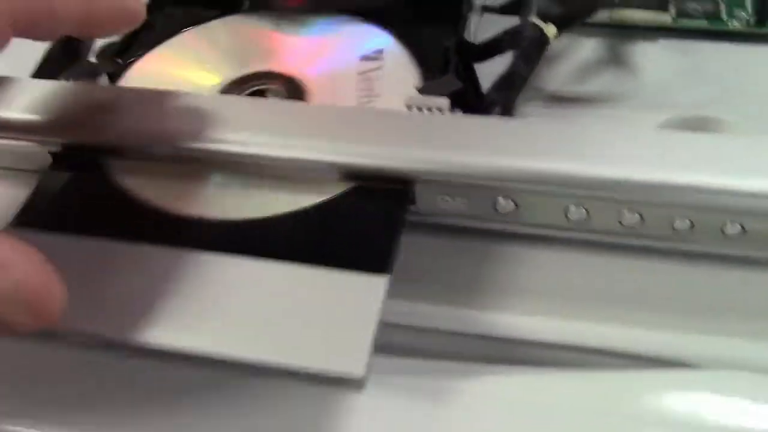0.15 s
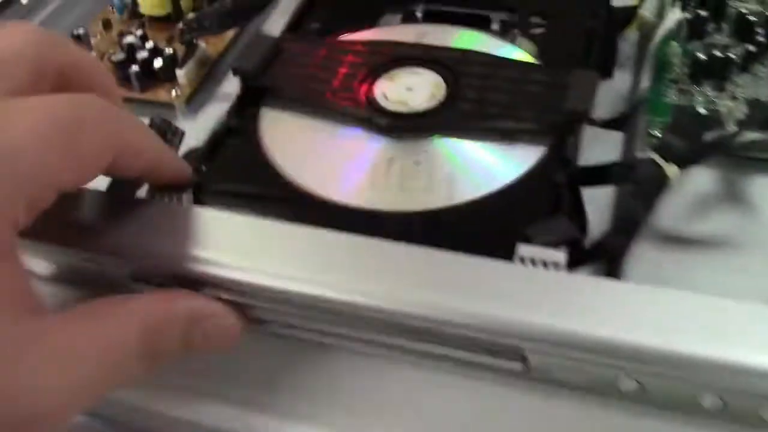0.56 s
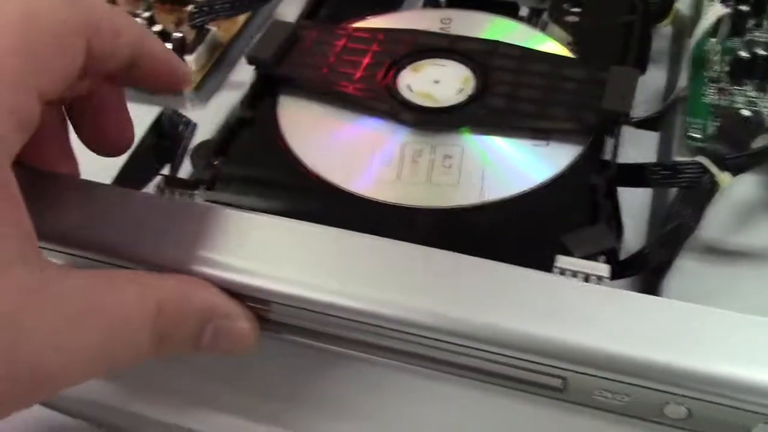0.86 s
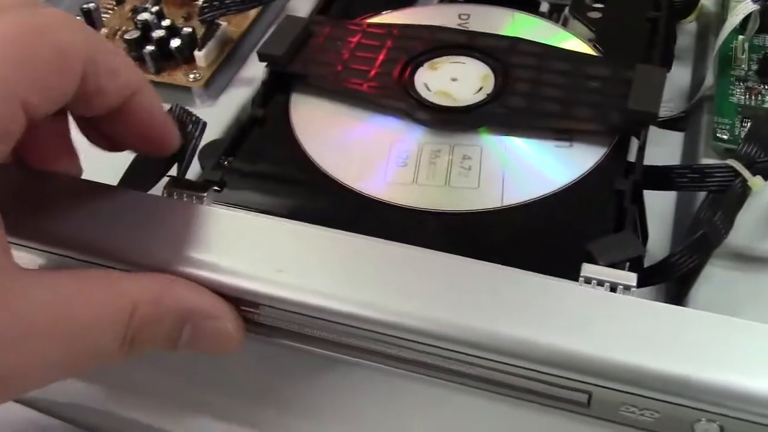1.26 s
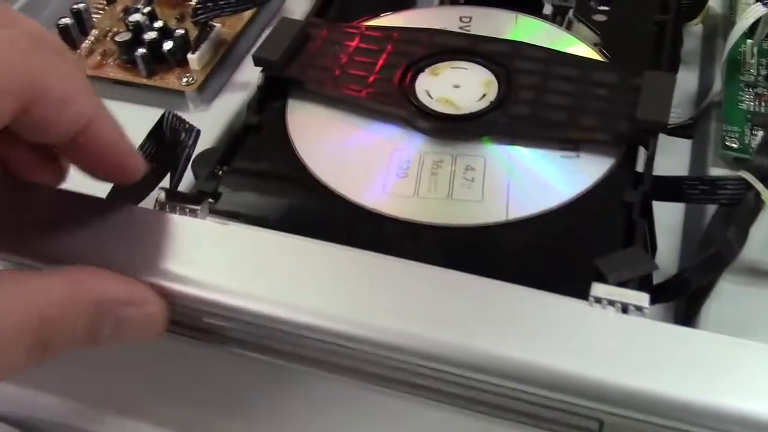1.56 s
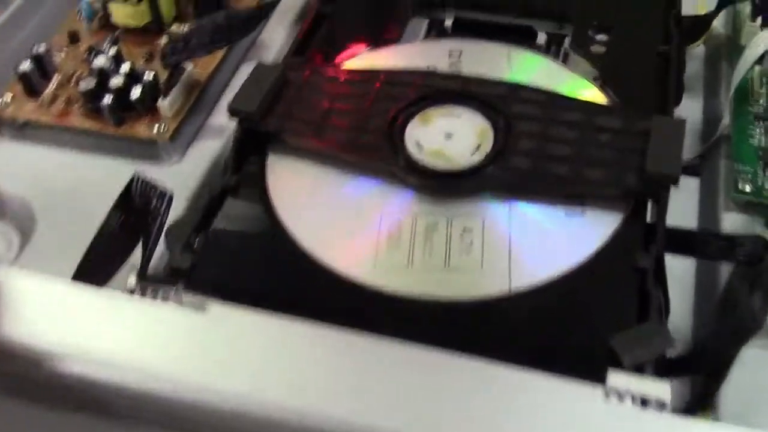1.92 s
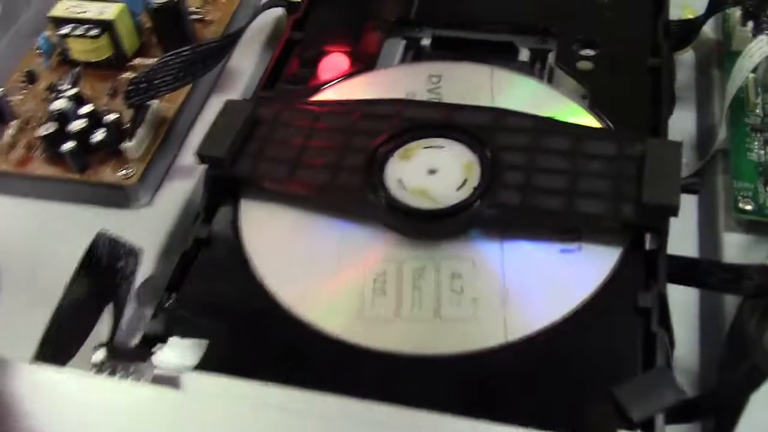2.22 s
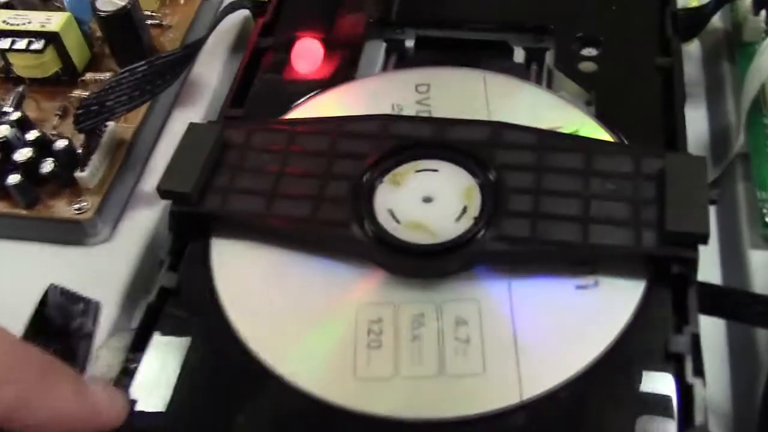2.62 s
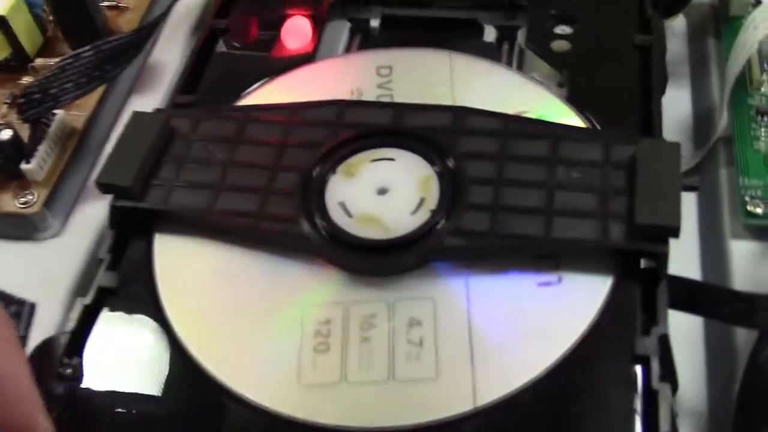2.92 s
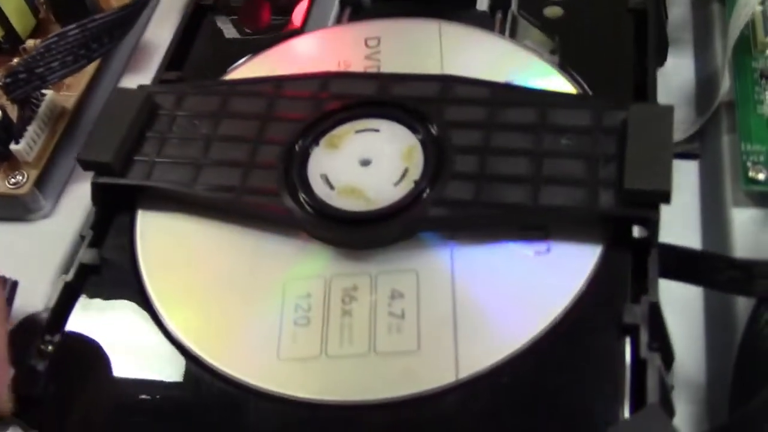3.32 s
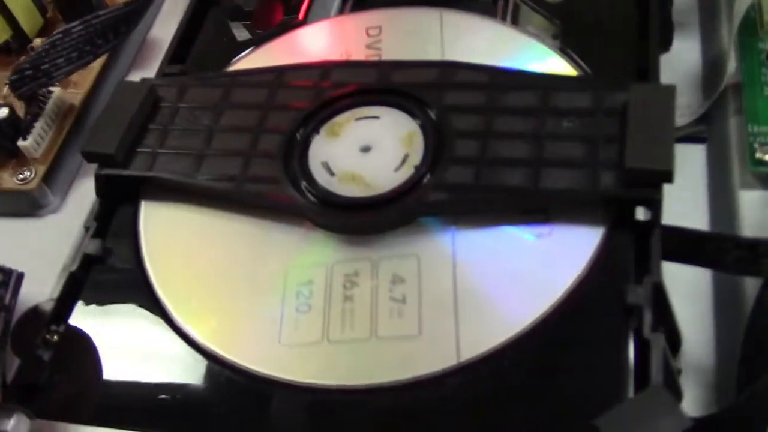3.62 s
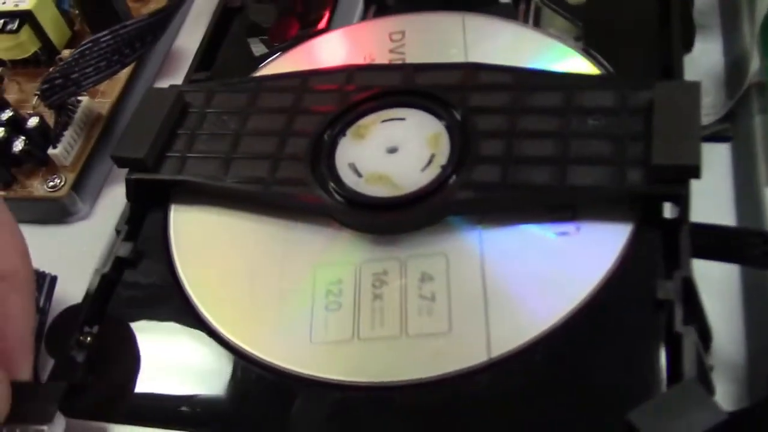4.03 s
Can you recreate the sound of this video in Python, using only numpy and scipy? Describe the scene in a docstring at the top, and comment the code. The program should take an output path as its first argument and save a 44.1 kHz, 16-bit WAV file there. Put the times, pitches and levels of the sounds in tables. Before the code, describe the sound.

A plastic disc tray is pushed in with a gritty whirring scrape, clatters shut sharply, then faint ticks and rustles over low hum.

```python
"""The disc tray of an opened DVD player is pushed shut by hand on a workbench, close to a stereo pair.
Gears whine at their tooth rate and rails rub as gritty noise; shaped noise bursts, ringing in the plastic,
make the latch, the stop and the clatter of the clamp.
Then filtered noise and short contacts tick and rustle faintly, over sine hum and a noise floor."""
import sys
import numpy as np
from scipy import signal
from scipy.fft import rfft, irfft, next_fast_len
from scipy.io import wavfile

SR = 44100
rng = np.random.default_rng(int(sys.argv[2]) if len(sys.argv) > 2 else 0)


def pcm_store(signal):
    """Save signal as 16-bit PCM."""
    levels = np.round(np.clip(np.atleast_2d(signal), -1, 1) * 32767)
    wavfile.write(sys.argv[1], SR, levels.astype(np.int16).T)


N = 184073
TIME = np.arange(N) / SR   # s

# How alike near sounds reach left and right. Each row: frequency in Hz, correlation.
NEAR_LIKENESS = [(150, 0.97), (700, 0.94), (2400, 0.94), (4400, 0.84), (15000, 0.64)]

STOP_S, SEATING_S = 0.562, 0.025   # the tray reaches its stop and takes this long to seat
TOUCH_S = 0.0011   # rise of the scrape before a square contact


def from_db(db):
    """Decibels to gain."""
    return 10 ** (np.asarray(db) / 20)


def rms_one(x):
    """Scale to rms 1."""
    return x / np.sqrt(np.mean(x ** 2) + 1e-20)


def at_hz(points, hz):
    """Read a curve over frequency on a log-frequency axis."""
    point_hz, values = np.transpose(points)
    return np.interp(np.log(hz + 0.001), np.log(point_hz), values)


def cut(x, hz, kind, order=2):
    """Butterworth filter."""
    sections = signal.butter(order, np.clip(hz, 10, 0.45 * SR), kind, fs=SR, output="sos")
    return signal.sosfilt(sections, x + 1e-18)


def drift(rate):
    """Random wander through normal knots of spread 1, at this many knots per second."""
    knots = rng.standard_normal(4096)
    return np.interp(TIME * rate, np.arange(len(knots)), knots)


def stereo_pair(mid, side, likeness):
    """Mix two independent signals into left and right with the given correlation."""
    alike = np.clip(likeness, -1, 1)
    return np.sqrt(1 + alike) * mid + np.sqrt(1 - alike) * side * [[1], [-1]]


def noise(spectrum, likeness, grain_db=0):
    """Coloured stereo noise of rms 1; uneven sample sizes make it gritty."""
    size = next_fast_len(N)
    hz = np.arange(size // 2 + 1) * SR / size
    grain = from_db(grain_db * np.minimum(rng.exponential(1, N), 6))
    mid, side = rfft(rng.standard_normal((2, N)) * grain, size)
    pair = stereo_pair(mid, side, at_hz(likeness, hz))
    coloured = pair * from_db(at_hz(spectrum, hz))
    return rms_one(irfft(coloured, size)[:, :N])


def resonate(x, resonances):
    """Sum of parallel two-pole resonances; each row: frequency in Hz, width in Hz, level in dB."""
    out = 0
    for hz, width, db in resonances:
        radius = np.exp(-np.pi * max(width, 10) / SR)
        zeros = np.array([1, 0, -1]) * (1 - radius ** 2) / 2
        poles = [1, -2 * radius * np.cos(2 * np.pi * hz / SR), radius ** 2]
        out = out + from_db(db) * signal.lfilter(zeros, poles, x)
    return out


def frame(x, share):
    """The plastic tray and frame add a share of their resonances to whatever passes through."""
    # Each row: frequency in Hz, width in Hz, relative level in dB.
    frame_modes = [(495, 26, 0), (880, 26, -4), (1352, 40.2, -7.5), (1523, 32, -1.5), (1789, 73, -4.5),
                   (2383, 52, 3.5), (2786, 44.4, -4.5), (3317, 50, 4), (3730, 142, 2.5), (6600, 42.3, -3),
                   (7090, 220, -6)]
    return x + share * resonate(x, frame_modes)


def case(x, echo_db=-7, fade_s=0.0069, count=40):
    """Quick reflections between the walls of the open case comb the treble."""
    delays = rng.uniform(0.001, 0.03, count)   # s
    sizes = np.exp(-delays / fade_s) * rng.choice([-1, 1], count)
    echoes = np.zeros(SR // 20)
    echoes[(delays * SR).astype(int)] = from_db(echo_db) * sizes / np.linalg.norm(sizes)
    reflected = signal.oaconvolve(x, echoes[None], axes=1)[:, :N]
    return x + cut(reflected, 920, "high")


def contacts(blows, crack_s, rattle_s, rattle_db, tail_db, bass_db, treble_db, chatter_db=3.0):
    """Parts scrape together, crack, rattle briefly and ring in case and room, dying band by band.

    Each blow: start in seconds, level, bass and treble in relative dB, rise of the scrape in seconds."""
    # Colour of struck plastic. Each row: frequency in Hz, relative level in dB per Hz.
    plastic = [(59, -36), (100, -5), (259, -10.5), (364, -10.5), (422, -25.5), (479, -2.5), (1050, -3.5),
               (1500, -2.5), (2200, -3), (3660, -4.5), (4720, -10.5), (10800, -16), (15800, -41.5)]
    # Ringing of case and room. Each row: frequency in Hz, time to die by 60 dB in seconds.
    ring_time = [(100, 0.64), (400, 0.46), (1000, 0.31), (3000, 0.22), (8000, 0.2), (15000, 0.057)]
    t = TIME[:SR // 2]
    before = t[:SR // 20][::-1]   # time left until the crack
    edges = 90 * 2 ** (np.arange(17) * 15 / 32)   # Hz
    # contact is made and lost many times within a blow
    chatter = rms_one(from_db(chatter_db * drift(900)))
    white = rng.standard_normal((2, 2, N)) * chatter   # neighbouring bands take turns
    out = np.zeros((2, N))
    for k, (low, high) in enumerate(zip(edges, edges[1:])):
        hz = np.sqrt(low * high)
        in_bass = at_hz([(600, 1.0), (1200, 0.082)], hz)
        in_treble = at_hz([(3500, 0.14), (6000, 0.98)], hz)
        crack = np.exp(-t / crack_s)
        rattle = from_db(rattle_db) * np.exp(-t / rattle_s)
        ring = from_db(tail_db - 60 * t / at_hz(ring_time, hz))
        decay = crack + rattle + ring
        power = np.zeros(N + SR)
        for s, level, bass, treble, rise_s in blows:
            tone_db = (bass + bass_db) * in_bass + (treble + treble_db) * in_treble
            size = from_db(level + tone_db + at_hz(plastic, hz))
            scrape = np.exp(-before / max(rise_s, 1 / SR))
            at = round(s * SR)
            shape = size * np.concatenate([scrape, decay])
            power[at - len(scrape):at + len(t)] += shape ** 2
        mid, side = cut(white[k % 2] * np.sqrt(power[:N]), [low, high], "band")
        out += stereo_pair(mid, side, at_hz(NEAR_LIKENESS, hz))
    return out


def room_floor(level_db=-54):
    """Steady diffuse noise of the workshop, much less alike at the two sides than near sounds."""
    # Colour of the room. Each row: frequency in Hz, relative level in dB per Hz.
    room_colour = [(15, -65.5), (25, -25), (59, -8), (123, -9.5), (141, -11.5), (170, -5.5), (205, -14.5),
                   (250, -6.5), (316, -15.5), (352, -9.5), (640, -16.5), (1040, -21), (1510, -19.5),
                   (2030, -22), (9990, -32.5), (15800, -43)]
    # Each row: frequency in Hz, left-right correlation.
    room_likeness = [(60, 0.61), (200, 0.42), (500, 0.017), (15000, .1)]
    return from_db(level_db) * noise(room_colour, room_likeness)


def hum(level_db=-1.5, waver_db=0.7, smear=0.22, spread=0.67):
    """Mains hum and thin electronic whistles waver a little and reach each side in a different phase."""
    # Each row: frequency in Hz, relative level in dB rms.
    hum_tones = [(59.2, -62.5), (118.4, -65.5), (173, -66), (239.8, -56.5), (473, -71.5), (779, -73.5),
                 (863, -74), (1798, -77), (5561, -78), (10018, -81.5)]
    sides = spread * np.array([[0.5], [-0.5]])   # radians
    out = 0
    for hz, db in hum_tones:
        phase = 2 * np.pi * hz * TIME + smear * (hz / 240) ** 0.5 * drift(11)
        level = np.sqrt(2) * from_db(db + level_db + waver_db * drift(12))
        out = out + level * np.sin(phase + sides)
    return out


def grip_db():
    """The hand's weight on the case: at rest, but for one quick rise and a slow release."""
    grip_s, peak_db, rest_db = 2.99, -55.5, -64.5
    rise_db_per_s, fall_db_per_s = 22, 8.5
    away_db = np.maximum(rise_db_per_s * (grip_s - TIME), fall_db_per_s * (TIME - grip_s))
    return np.maximum(peak_db - away_db, rest_db)


def rustle(judder_db=2.5):
    """Light rubbing in the drive is juddering noise; the case under the hand rumbles dully."""
    # Light rubs. Each row: middle in seconds, half-length in seconds, relative level in dB.
    rubs = [(2.196, 0.14, -59.5), (2.672, 0.013, -54.5), (2.802, 0.058, -58.5), (2.937, 0.026, -52.5),
            (3.064, 0.052, -57), (3.323, 0.067, -52.5), (3.586, 0.023, -53), (3.848, 0.051, -57.5)]
    # Colour of rubbing plastic. Each row: frequency in Hz, relative level in dB per Hz.
    rub_colour = [(1200, -13), (1900, -5), (2500, -10.5), (3300, -1.5), (4100, -1), (4800, -11),
                  (6000, -10.5), (9500, -19.5), (14000, -27)]
    rumble_colour = [(40, -45), (120, -12), (200, -10.5), (290, 7), (420, -4), (600, -13.5),
                     (850, -4.0), (1300, -37), (4000, -55.5)]   # Hz, dB per Hz
    pressure = sum(from_db(db) * np.exp(-((TIME - s) / half) ** 2) for s, half, db in rubs)
    texture = rms_one(case(noise(rub_colour, NEAR_LIKENESS, grain_db=2.5)))
    rub = pressure * from_db(judder_db * drift(150)) * texture
    rumble = noise(rumble_colour, NEAR_LIKENESS)
    return rub + rumble * from_db(grip_db() + 2.0 * drift(25.26))


def pickup(half_length_s=0.01):
    """The laser pickup jerks as it hunts for the disc; short noise pushes excite its resonances."""
    # Jerks. Each row: middle in seconds, relative level in dB.
    twitches = [(1.232, -54), (1.485, -57.5), (1.739, -56.5), (2.243, -57)]
    # Each row: resonance in Hz, width in Hz, relative level in dB.
    pickup_modes = [(1600, 52, 2.5), (1957, 85, -0.5), (5600, 110, -9), (6760, 340, -17)]
    push = sum(from_db(db) * np.exp(-((TIME - s) / half_length_s) ** 2) for s, db in twitches)
    return from_db(19.5) * resonate(push * rng.standard_normal(N) + 1e-18, pickup_modes)


def ticks(steepness=8.1):
    """Small contacts of rails, drive and case: the more one grazes, the thinner, brighter and longer."""
    # Each row: start in seconds, relative level in dB, glance from 0 (dull, square) to 1 (bright, grazing).
    small_ticks = [(.156, -29, 0.4), (.206, -25.5, 0.62), (.285, -30, 0.7), (1.104, -38.5, .1),
                   (1.540, -40, 0.36), (1.586, -38.5, 0.6), (1.97, -43.5, .15), (2.113, -42, 0.076),
                   (2.551, -36, 0.33), (2.722, -43, 0.82), (2.920, -34.5, 0.43), (2.934, -39, 0.57),
                   (3.301, -40, 0.9), (3.819, -49.5, .88), (4.065, -38, .7), (4.084, -40.5, 0.92)]
    graze_s = 0.017   # added to the scrape of a fully grazing touch
    s, db, glance = np.transpose(small_ticks)
    glance = np.clip(glance, 0, 1)
    bass = np.interp(glance, [0, 1], (-1.5, -16))
    treble = np.interp(glance, [0, 1], (-30, -4.5))
    blows = list(zip(s, db, bass, treble, TOUCH_S + graze_s * glance ** steepness))
    struck = contacts(blows, crack_s=0.0041, rattle_s=0.015, rattle_db=-7.5, tail_db=-17.0,
                      bass_db=13.5, treble_db=18.5)
    return from_db(-8.0) * frame(struck, share=0.9)


def chassis(push_s=0.0015):
    """Soft blows set the low modes of the sheet-metal base ringing as decaying sines."""
    # Dull bumps. Each row: start in seconds, relative level in dB.
    bumps = [(.425, -31), (.565, -28.5), (0.583, -29.5), (0.631, -30.5), (2.554, -52.5), (2.935, -52.5),
             (3.040, -41)]
    # Each row: mode in Hz, relative level in dB, time to die by 60 dB in seconds.
    chassis_modes = [(73, -14, 0.329), (123.6, -10.5, 0.29), (178.2, -12.5, 0.66), (244, -8.5, 0.19),
                     (299.7, -9, 0.49), (359.3, -7.5, 0.4), (390, -8, 0.56)]
    out = np.zeros(N)
    for s, level_db in bumps:
        start = int(s * SR)
        t = np.maximum(TIME - s, 0)[start:int((s + 1) * SR)]
        onset = 1 - np.exp(-t / push_s)
        chances = rng.standard_normal((len(chassis_modes), 2))   # dB, turns
        for (hz, db, t60), (size, phase) in zip(chassis_modes, chances):
            fading = from_db(level_db + db + size - 60 * t / t60)
            out[start:start + len(t)] += fading * np.sin(2 * np.pi * (hz * t + phase)) * onset
    return out


def gears(octave_db=-13, flutter=0.009, rough_db=2.0, hiss_db=-67):
    """The pushed tray spins the gears; teeth sing at the mesh rate, louder under load, then run down."""
    # Mesh rate, following the speed of the push. Each row: time in seconds, rate in Hz.
    mesh_rate = [(0, 421), (.06, 390), (.105, 427), (.16, 392.3), (.245, 391.5), (.32, 530), (.51, 554.7)]
    gear_db, fade_db_per_s = -52, 14   # level off resonance, fade while running down
    coast_s, run_down_s = 0.28, 0.342   # time constant of slowing, time until the gears stop
    sing_hz, sing_width_hz, sing_db = 387.7, 48, 8.5   # the case sings along near this pitch
    lift_s, lift_length_s, load_db = 0.585, 0.053, 11.5   # lifting the drive loads the gears
    mesh_s, mesh_hz = np.transpose(mesh_rate)
    coasting = np.maximum(TIME - mesh_s[-1], 0)
    hz = np.interp(TIME, mesh_s, mesh_hz) * np.exp(-coasting / coast_s)
    singing = sing_db / (1 + ((hz - sing_hz) / sing_width_hz) ** 2)
    load = load_db * np.exp(-((TIME - lift_s) / lift_length_s) ** 2)
    db = gear_db + singing + load - fade_db_per_s * coasting
    turning = np.sqrt(np.clip(1 - (coasting / run_down_s) ** 10, 0, 1))
    phase = 2 * np.pi * np.cumsum(hz * (1 + flutter * drift(129))) / SR
    teeth = np.sin(phase) + from_db(octave_db) * np.sin(2 * phase)
    mesh = np.sqrt(2) * from_db(db + rough_db * drift(54)) * teeth
    # a thin high hiss lifts a little as the gears speed up
    hiss_phase = 2 * np.pi * np.cumsum(12200 + 1.9 * hz) / SR
    hiss = cut(rng.standard_normal(N), 300, "low", order=1) * np.sin(hiss_phase)
    return mesh * turning + from_db(hiss_db) * rms_one(hiss) * (TIME < STOP_S)


def rails(judder_db=3.0):
    """Gritty, juddering friction grows as the tray goes in, until it reaches its stop."""
    # Colour of the rails. Each row: frequency in Hz, relative level in dB per Hz.
    rail_colour = [(60, -14.5), (170, -5), (330, -12.5), (540, -6), (650, -9.5), (870, -4.5), (1150, -16),
                   (1400, -11.5), (2400, -9.5), (3700, -12), (4800, -21), (7300, -24), (12000, -32),
                   (15800, -46)]
    # Sliding tray. Each row: resonance in Hz, width in Hz, relative level in dB.
    tray_panel = [(841, 18, 2), (946, 17, -0.5)]
    slide_db, rise_db_per_s = -47, 23
    moving = np.interp(TIME, [STOP_S, STOP_S + SEATING_S], [1, 0])
    friction_db = slide_db + rise_db_per_s * np.minimum(TIME, STOP_S)
    grit = noise(rail_colour, NEAR_LIKENESS, grain_db=3.5) * from_db(judder_db * drift(220))
    rubbing = frame(grit, share=0.38) + resonate(grit, tray_panel)
    return from_db(friction_db) * moving * rms_one(case(rubbing))


def clamp(bounces=4):
    """The clamp drops on the disc, then settles in a quick run of bounces that ring the disc."""
    # Disc and clamp. Each row: resonance in Hz, width in Hz, relative level in dB.
    disc_modes = [(844, 43, -15), (1270, 25.2, -3), (1390, 40, -7.5), (1897, 64, 3), (2034, 28, -2.5),
                  (2995, 41, -2), (3650, 230, -5.5)]
    drop_s, drop_db = 0.632, -1
    bounce_s, loss_db, least_db = 0.0113, 8, -17.5   # spacing, loss per bounce, lightest chatter
    blows = [(drop_s, drop_db, -15, -9, 0.0031)]
    for k in range(1, bounces + 1):
        level = max(drop_db - k * loss_db, least_db)
        blows.append((drop_s + k * bounce_s, level, -7, -11.5, TOUCH_S))
    struck = contacts(blows, crack_s=0.0024, rattle_s=0.0067, rattle_db=-17, tail_db=-21.0,
                      bass_db=14.5, treble_db=13.0)
    return from_db(-6.5) * (struck + from_db(11) * resonate(struck, disc_modes))


def tray():
    """The tray scrapes up the lift cam and knocks home; the firmer it sits, the more bass a knock has."""
    # Knocks past the latch and into the stop.
    # Each row: start in seconds, level in relative dB, treble in relative dB, scrape rise in seconds.
    knocks = [(.4175, -6, -17.5, 0.00023), (.433, -13, -3, 0.0028), (.441, -9, -26, 0.0011),
              (0.4482, -4.5, -9.5, 0.0028), (0.535, -8, -12, .0006), (.560, 2, -21.5, .0003),
              (0.5652, 1.5, -4, 0.00087), (.575, -4, -12.5, .001), (.585, -9, -14.5, 0.0037)]
    loose_bass_db, seated_bass_db = -23, -5.5
    blows = [(0.554, -9, -18, -3, 0.02)]   # one swelling scrape up the cam
    for s, db, treble, scrape_s in knocks:
        bass = np.interp(s, [STOP_S, STOP_S + SEATING_S], [loose_bass_db, seated_bass_db])
        blows.append((s, db, bass, treble, scrape_s))
    struck = contacts(blows, crack_s=0.0027, rattle_s=0.0064, rattle_db=-13.5, tail_db=-16.5,
                      bass_db=17.5, treble_db=12.5)
    return from_db(-7.0) * frame(struck, share=1.35)


def scene():
    """The clatter, the small sounds around it and the workshop floor, placed a little to the left."""
    background = room_floor() + hum() + rustle()
    mechanism = (pickup() + chassis() + gears()) * from_db([[0.5], [-0.5]])
    player = case(ticks() + clamp() + tray())
    return (background + mechanism + rails() + player) * from_db([[0.35], [-0.35]])


def record(dry, top=1.0, cutoff_hz=15850):
    """The highest peaks are rounded off and the treble is cut steeply."""
    rounded = dry / (1 + (dry / top) ** 4) ** (1 / 4)
    steep = signal.ellip(12, 0.1, 85, cutoff_hz, fs=SR, output="sos")
    return signal.sosfilt(steep, rounded)


dry = scene()
out = record(dry)
pcm_store(out)
```